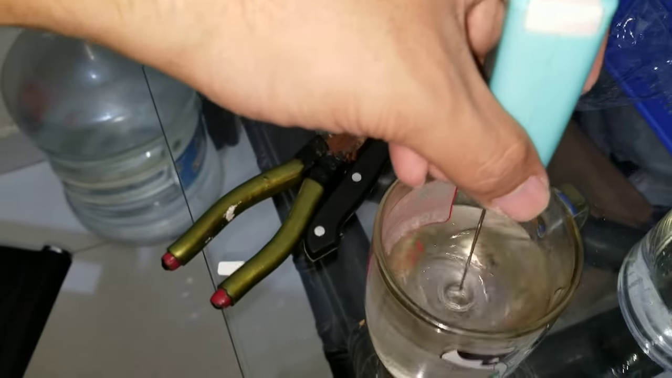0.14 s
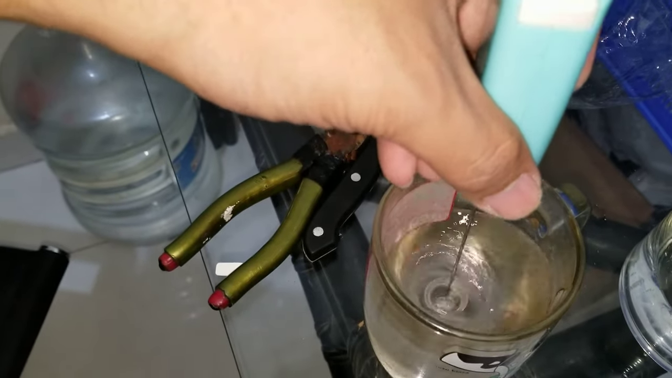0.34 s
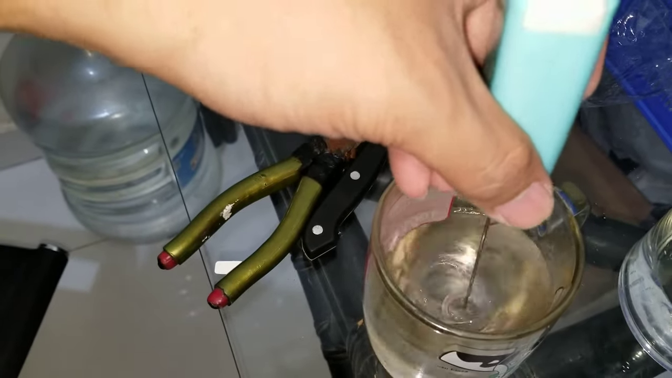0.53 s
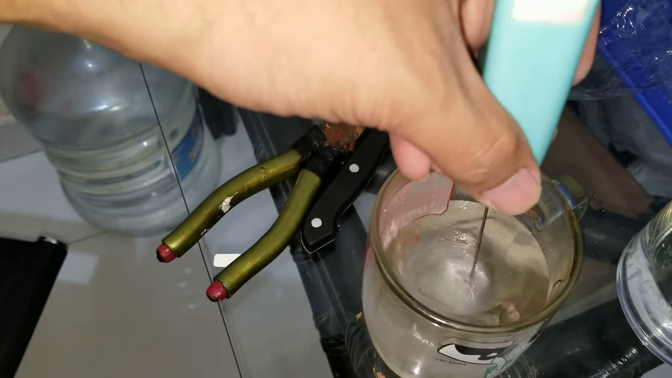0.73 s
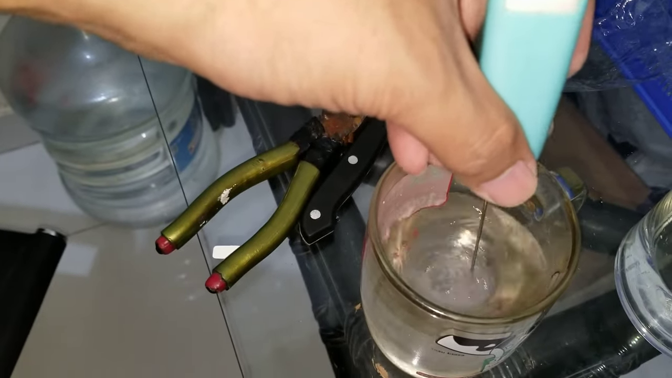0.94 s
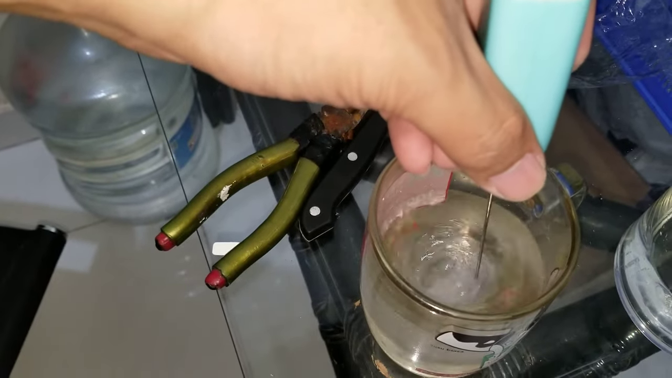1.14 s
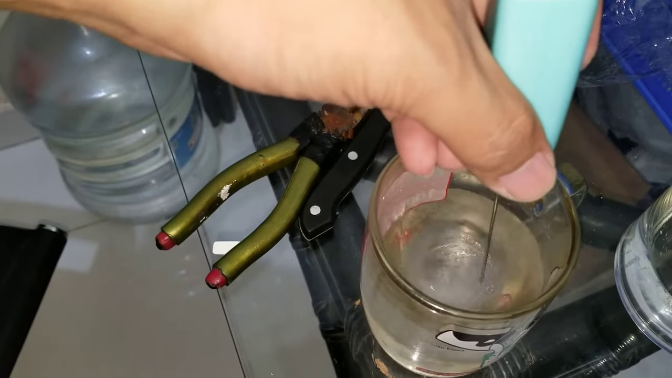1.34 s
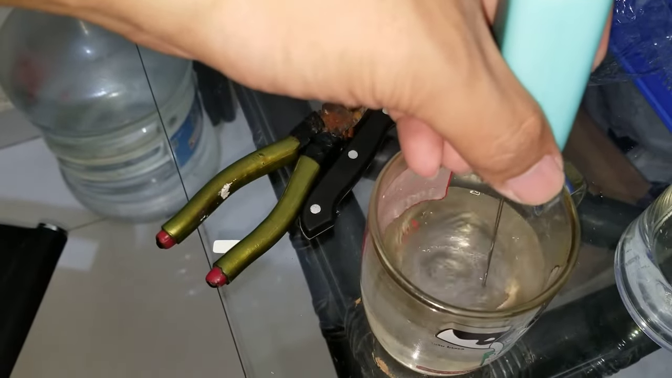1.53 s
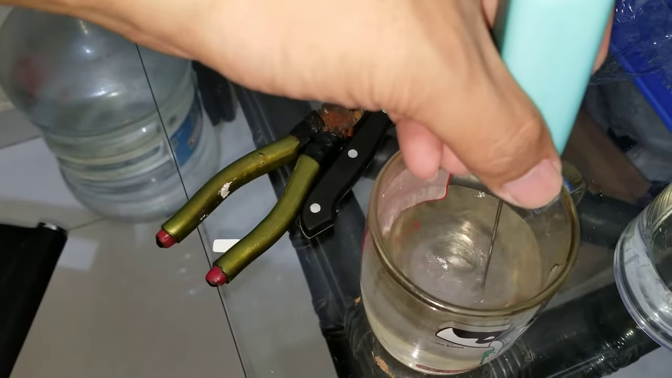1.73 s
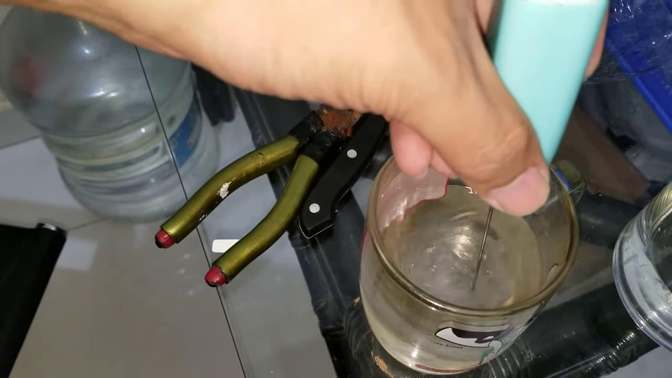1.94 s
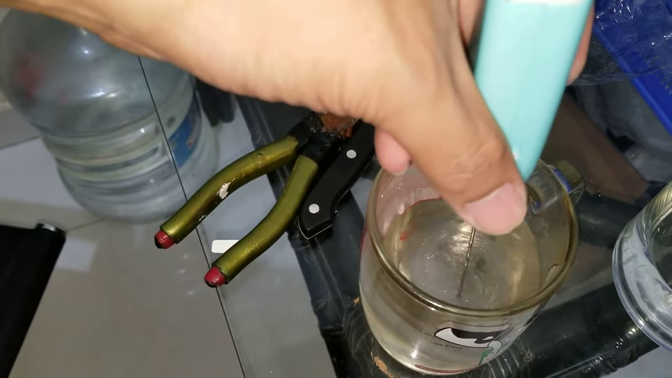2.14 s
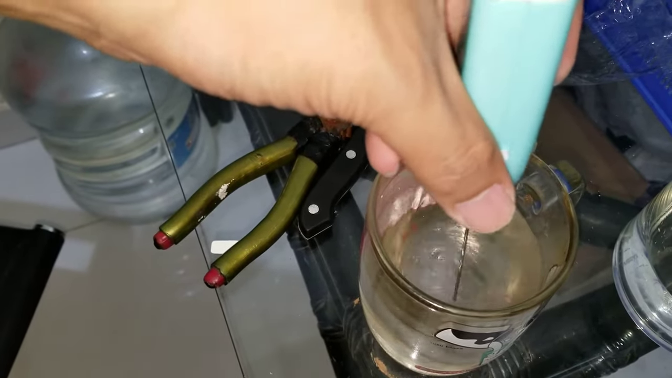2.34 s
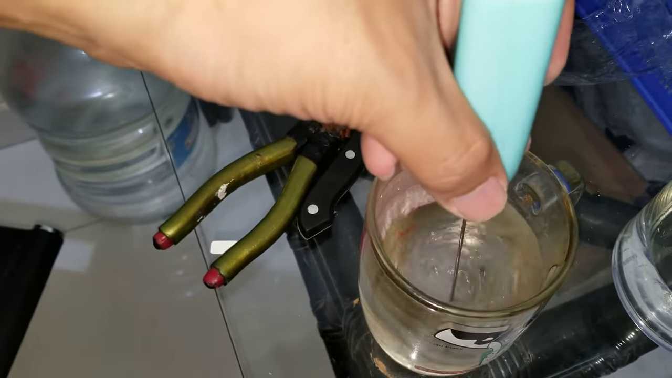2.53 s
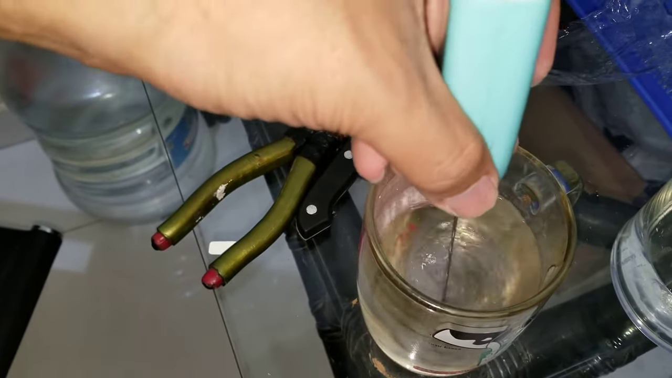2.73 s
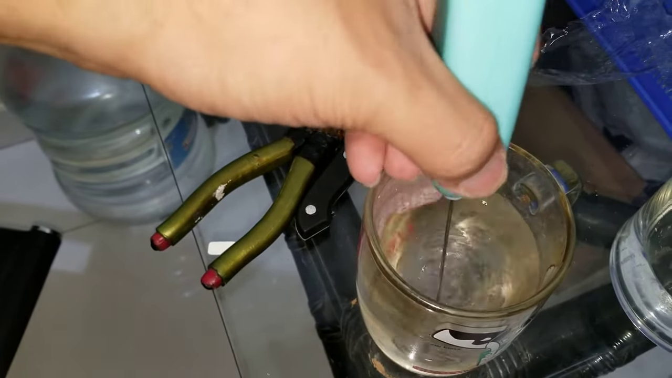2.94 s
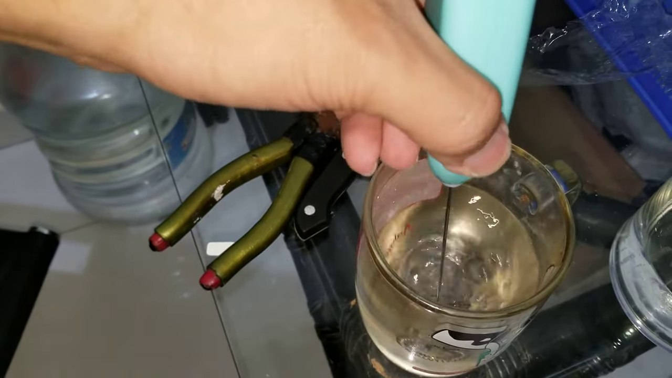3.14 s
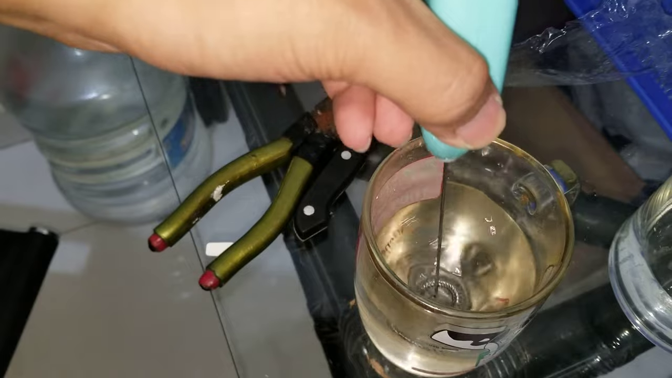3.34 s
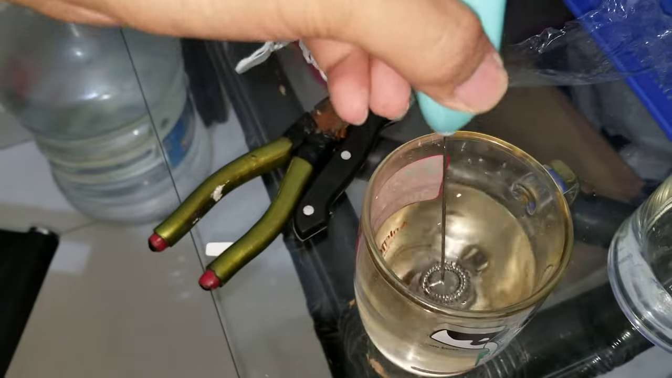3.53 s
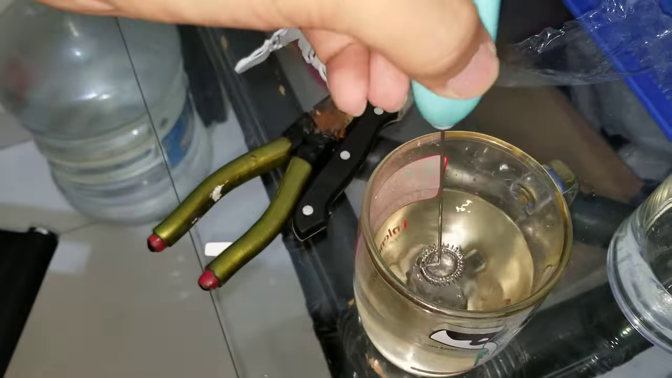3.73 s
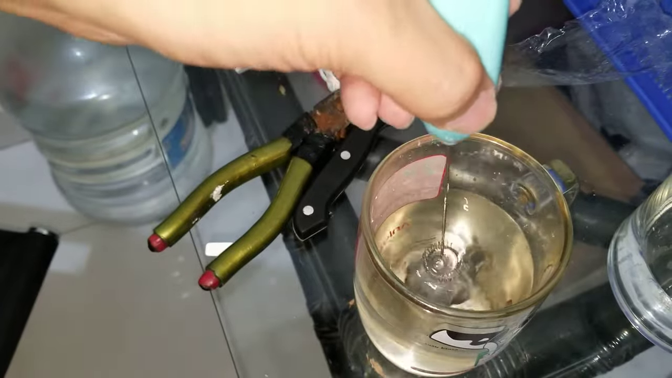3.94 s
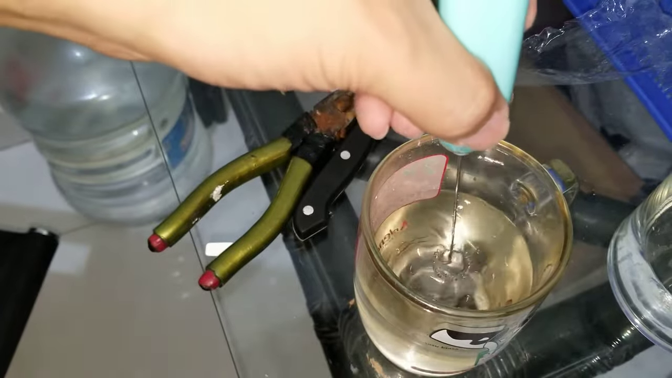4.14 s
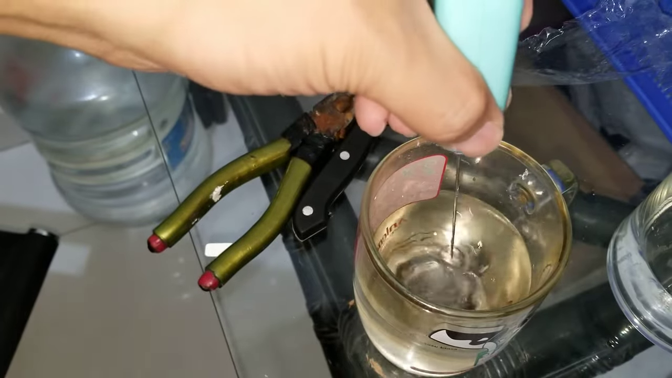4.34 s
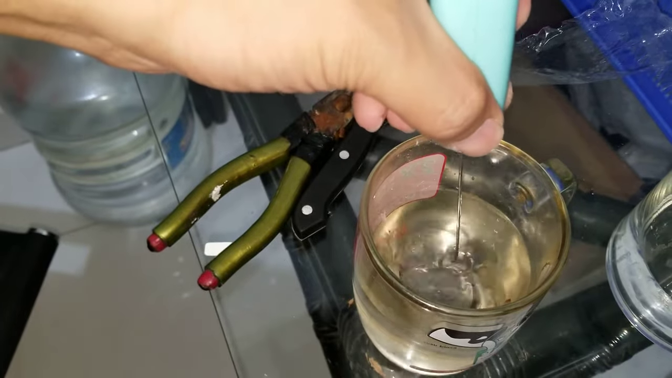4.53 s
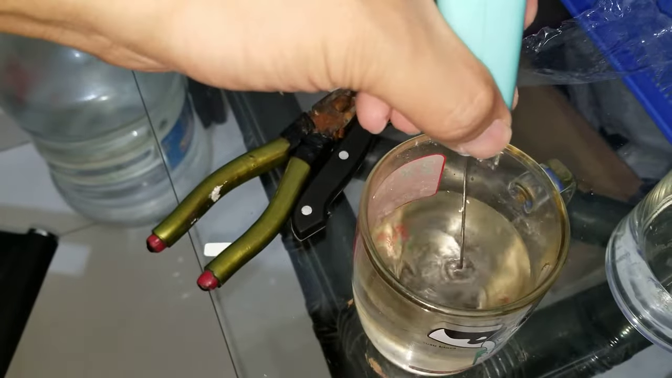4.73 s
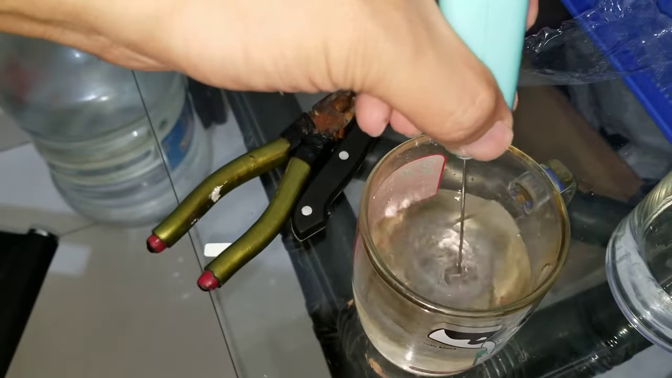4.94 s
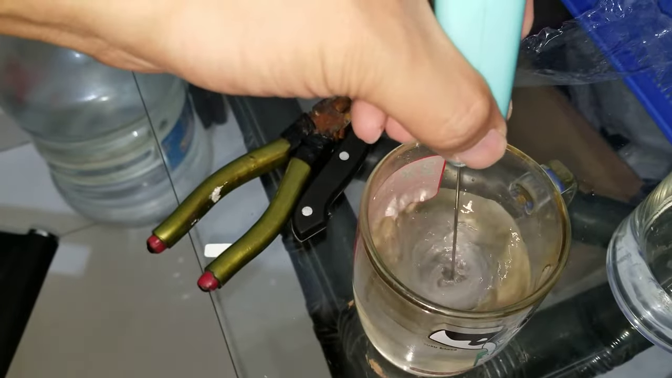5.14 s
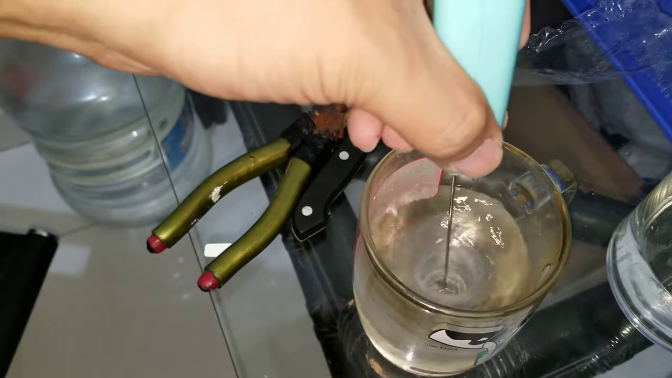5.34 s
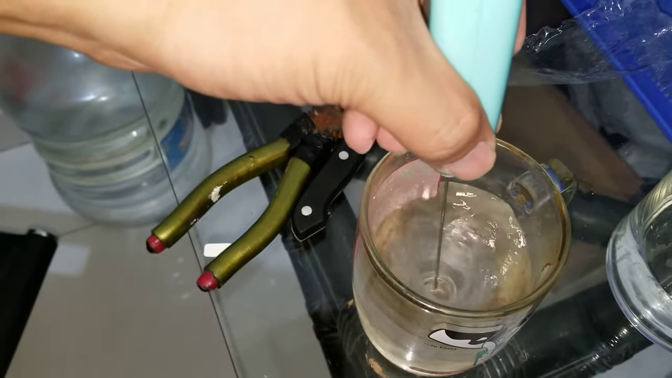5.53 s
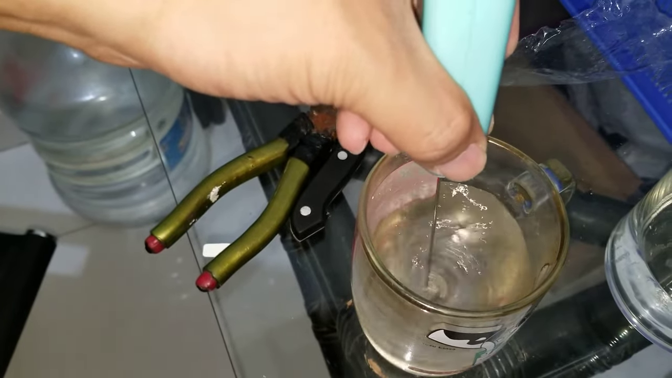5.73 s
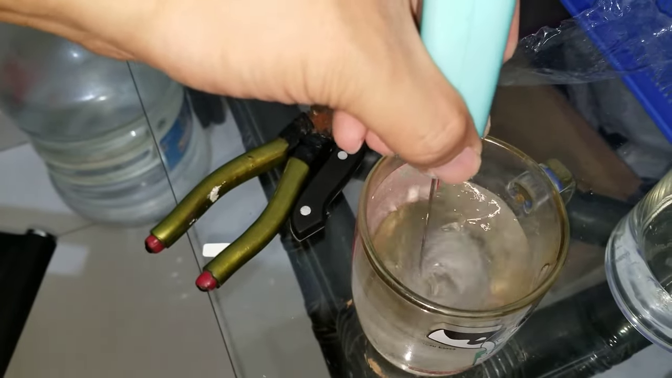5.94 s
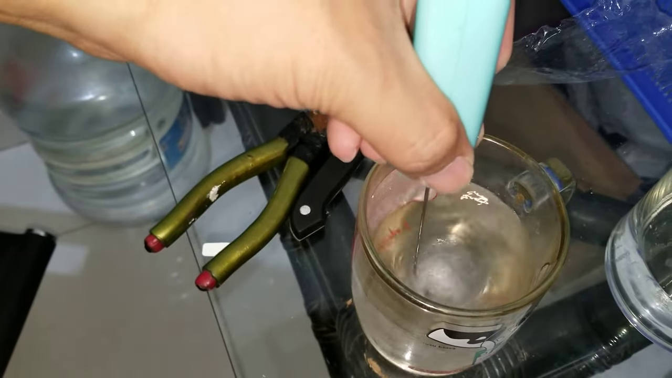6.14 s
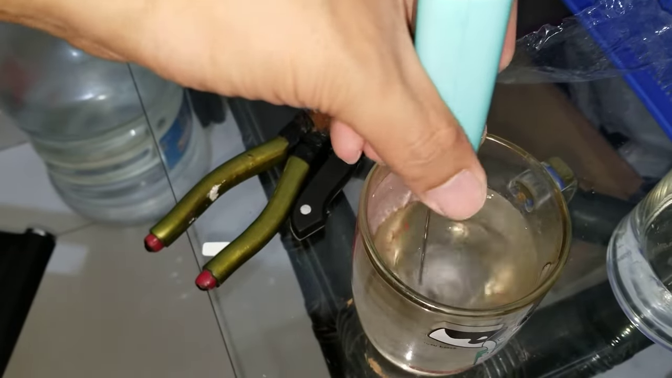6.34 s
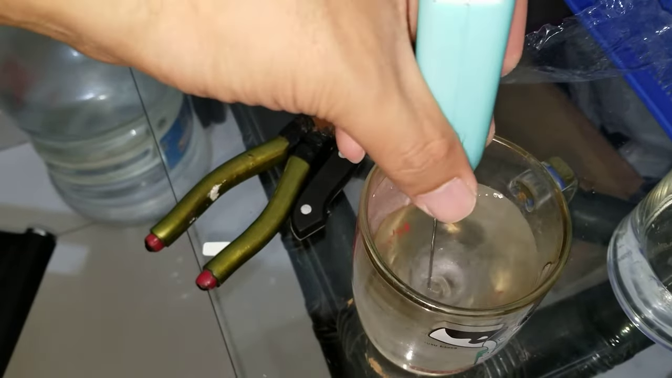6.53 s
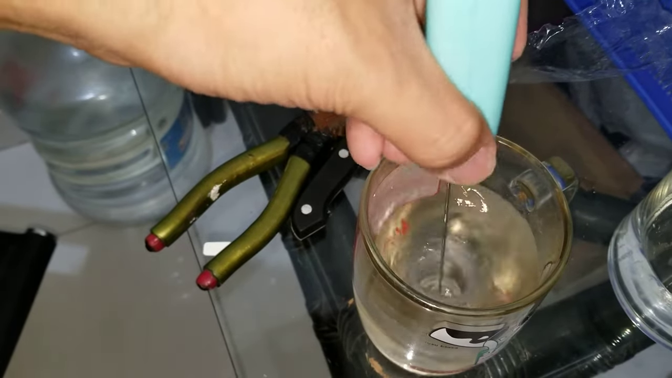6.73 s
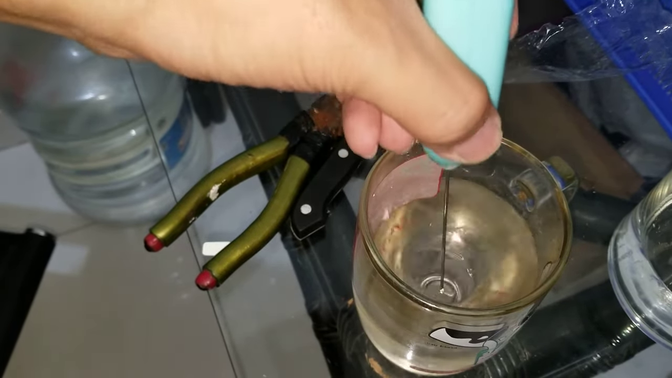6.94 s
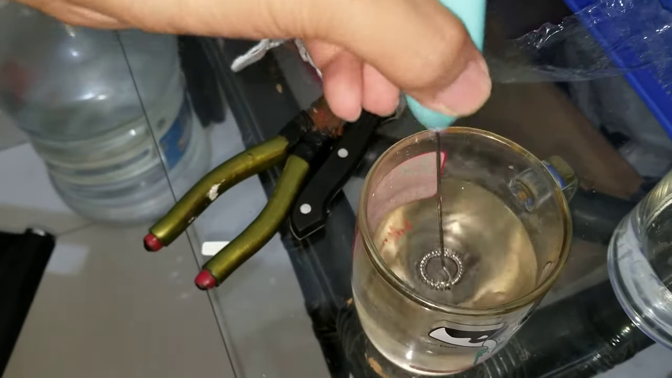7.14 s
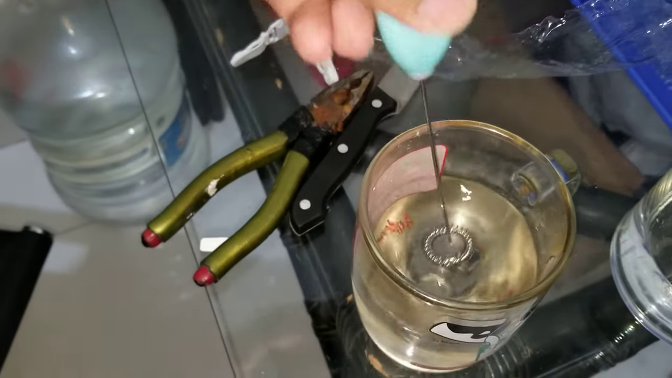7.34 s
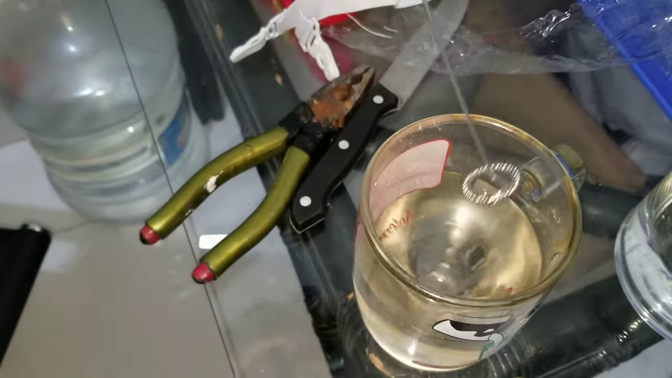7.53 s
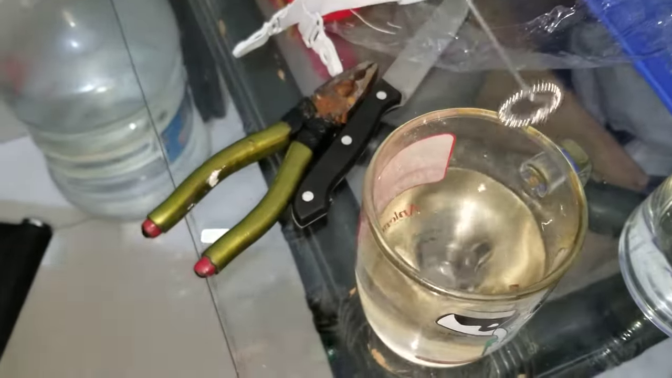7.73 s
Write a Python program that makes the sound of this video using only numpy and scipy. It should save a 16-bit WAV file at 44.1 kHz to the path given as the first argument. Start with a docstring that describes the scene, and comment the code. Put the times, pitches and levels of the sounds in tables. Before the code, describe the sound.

A thin motor whir and bubbly churning of water in a glass mug, recorded close with short room reflections. It surges wetly at first, then eases to a steadier burble. A loud click cuts it, leaving low appliance hum that briefly dips. It clicks on again, spits, deepens into rough gurgling and spray, clicks off with last gulps, and leaves quiet room tone.

```python
"""Milk frother in a glass mug

A battery frother whisks water close by in a small hard room: running at first, it clicks off, on and off again.
Noise and resonances make the whirring motor; clouds of short rising tones make the bubbles, from gurgle to hiss.
Single gulps, splashes, knocks and drips are placed by table, and the water settles within a moment of each spell.
Behind lie coloured noise and the sine tones of a humming appliance, dipping together after the first click."""
import sys
import numpy as np
from scipy import signal
from scipy.fft import rfft, irfft, next_fast_len
from scipy.io import wavfile
from scipy.ndimage import uniform_filter1d, map_coordinates

SR = 44100
rng = np.random.default_rng(int(sys.argv[2]) if len(sys.argv) > 2 else 0)


def wav_out(sig):
    """Save sig, one row per channel (or a flat mono array), as 16-bit PCM at SR to the path in sys.argv[1]."""
    wavfile.write(sys.argv[1], SR, np.round(np.clip(np.atleast_2d(sig).T, -1, 1) * 32767).astype(np.int16))


N = 348121  # length in samples


def amp(db):
    """Decibels to gain."""
    return 10 ** (np.asarray(db) / 20)


def unit(x):
    """Scaled to rms 1."""
    return x / np.sqrt(np.mean(x ** 2) + 1e-20)


def along(points, hz):
    """Reads (Hz, value) points on a log frequency axis."""
    f, v = np.transpose(points)
    return np.interp(np.log(hz + 1), np.log(f + 1), v)


def curves(rows):
    """One value per sample for each column after the time."""
    s, *cols = np.transpose(rows)
    return np.array([np.interp(np.arange(N) / SR, s, c) for c in cols])


def wobble(rate):
    """A smooth random curve, rate knots a second."""
    knots = rng.standard_normal(int(N * rate / SR) + 4)
    return map_coordinates(knots, [np.arange(N) * rate / SR])


def filtered(x, response):
    """Multiplies the spectrum of x by a response of frequency."""
    m = next_fast_len(x.shape[-1] + 8192)
    spectrum = rfft(x, m) * response(np.fft.rfftfreq(m, 1 / SR))
    return irfft(spectrum, m)[..., :x.shape[-1]]


def coloured(x, colour, size=2048):
    """Causal, minimum-phase filter with the given (Hz, dB) shape."""
    cepstrum = irfft(np.log(amp(along(colour, np.fft.rfftfreq(size, 1 / SR)))))
    # folding the cepstrum forward in time makes the filter minimum-phase
    cepstrum[1:size // 2] *= 2
    cepstrum[size // 2 + 1:] = 0
    impulse = irfft(np.exp(rfft(cepstrum)))
    return signal.oaconvolve(x, impulse[None], axes=1)[:, :N]


def add(track, s, sound):
    """Mixes a sound into the track at time s."""
    part = track[..., max(round(s * SR), 0):][..., :sound.shape[-1]]
    part += sound[..., :part.shape[-1]]


def panned(x, left_db):
    """Leans a sound to the left by left_db."""
    return x * amp([[left_db / 2], [-left_db / 2]])


def band(count, hz, sharpness):
    """Stereo noise through a steep-sided resonance, rms 1."""
    width = hz / sharpness

    def response(f):
        return (1j * f * width / (hz * hz - f * f + 1j * f * width)) ** 2
    return unit(filtered(rng.standard_normal((2, count)), response))


def resonator(hz, width_hz, rate, spread_db):
    """A resonance, steady or gliding, struck at random moments (rate a second), rms 1."""
    struck = rng.random(N) < rate / SR
    strength = amp(spread_db * np.clip(rng.standard_normal(N), -2, 2))
    kicks = struck * strength * np.exp(2j * np.pi * rng.random(N))
    envelope = signal.sosfilt(signal.butter(2, width_hz / 2, fs=SR, output="sos"), kicks)
    carrier = np.exp(2j * np.pi * np.cumsum(np.broadcast_to(hz, N)) / SR)
    return unit((envelope * carrier).real)


# hum of an appliance motor and the mains: pitch_hz [Hz], level_db [dB rms at the median background]
HUM_TONES = [(48.4, -71), (90.2, -61), (100.3, -59.5), (180.4, -58), (201.6, -75.5), (252.2, -77),
             (270.5, -66.5), (360.7, -69), (380.2, -68.5), (850, -65)]
# colour of the room noise: freq_hz [Hz], density_db [dB per Hz, relative]
AIR_COLOUR = [(25, -24.5), (45, 0.5), (70, -4.5), (115, -2.5), (200, -0.5), (380, -3.5), (520, -3),
              (850, -3.5), (1300, -9.5), (2300, -12.5), (4300, -14.5), (6500, -24), (11000, -29.5),
              (15500, -36.5)]
# gain on noise and hum alike, ducking after the loud click and recovering:
# time_s [s], level_db [dB rms of the noise]
BACKGROUND_GAIN = [(0, -50.5), (2.85, -51), (3.2, -56), (3.95, -57), (4.4, -52), (7.89, -52)]
# stereo width of the room noise: freq_hz [Hz], left-right likeness [1 = same]
LIKENESS = [(50, 0.97), (150, 0.73), (350, 0.9), (700, 0.14), (2000, 0.042), (8000, .1)]


def background(waver_db=1):
    """Room noise, wider in the treble, and wavering hum tones; one gain ducks both after the loud click."""
    level_db, = curves(BACKGROUND_GAIN)

    def mid_side(hz):
        turn = np.arccos(np.clip(along(LIKENESS, hz), -1, 1)) / 2
        return amp(along(AIR_COLOUR, hz)) * [np.cos(turn), np.sin(turn)]
    mid, side = filtered(rng.standard_normal((2, N)), mid_side)
    air = unit(np.array([mid + side, mid - side]))
    t = np.arange(N) / SR
    hum = np.zeros(N)
    for hz, db in HUM_TONES:
        phase = 2 * np.pi * (hz * t + rng.random()) + hz / 600 * wobble(4)
        hum += amp(db + waver_db * wobble(3.055)) * np.sqrt(2) * np.sin(phase)
    return amp(level_db) * air + amp(level_db - np.median(level_db)) * hum


# decay of the room: freq_hz [Hz], t60_s [s to fall 60 dB]
ROOM_DECAY = [(200, 0.56), (1200, 0.47), (4000, 0.59), (8000, .42), (15000, 0.38)]


def room(x):
    """The hard walls answer after 5 ms with a noise tail, each frequency dying at its own speed."""
    hz, t, z = signal.stft(rng.standard_normal((2, SR * 2 // 3)), SR, nperseg=256)
    decay = amp(-60 * t / along(ROOM_DECAY, hz)[:, None])
    tail = signal.istft(z * decay, SR, nperseg=256)[1]
    tail = np.pad(tail, ((0, 0), (SR // 200, 0))) / np.linalg.norm(tail[0])
    return signal.fftconvolve(x, tail, axes=1)[:, :N]


def bubble(t, hz, cycles, rise):
    """A bubble falls 60 dB in a few cycles and goes up in pitch as it nears the surface."""
    age = t * hz / cycles
    tone = np.sin(2 * np.pi * hz * t * (1 + rise * np.minimum(age, 2)))
    return tone * amp(-60 * age) * (1 - np.exp(-2 * t * hz))


# soft bumps of the hand: start_s [s], level_db [dB, relative], pitch_hz [Hz]
HAND_BUMPS = [(0.113, -27.5, 245), (7.339, -35, 160)]


def bumps(cycles=2.15):
    """Dull, low knocks of the hand: heavily damped tones of steady pitch."""
    track, t = np.zeros(N), np.arange(SR // 10) / SR
    for s, db, hz in HAND_BUMPS:
        add(track, s, amp(db + 15.5) * bubble(t, hz, cycles, 0))
    return track


TOP_HZ = 15900  # nothing sounds above this
# ring of the plastic handle: pitch_hz [Hz], level_db [dB, relative], t60_s [s]
HANDLE_RING = [(2300, -12.5, 0.018), (3240, -26, .015), (4530, -12, 0.012), (6490, -12.5, 0.013),
               (8790, -0.5, 0.0053), (10400, 0, 0.0058), (11680, -7.5, 0.01), (12800, -8, 0.0074),
               (14700, -14, .008)]
# the thumb switch: start_s [s], level_db [dB, relative], tilt_db [dB per octave],
# spring_db [dB, relative level of the spring's buzz]
SWITCH_CLICKS = [(2.9042, -4.5, 3.5, -17.5), (4.272, -39, -6.5, -45), (4.3439, -18.5, -6, -32),
                 (6.7115, -7.5, 2.5, -45)]


def switch(crack_t60=0.0049, rattle_db=-21, rattle_t60=0.03, spring_hz=4020, spring_t60=0.31):
    """The switch snaps over: a hard crack, a short ring of the handle, a rattle and the buzz of its spring."""
    track, t = np.zeros((2, N)), np.arange(SR // 3) / SR
    for s, db, tilt_db, spring_db in SWITCH_CLICKS:
        ring = np.zeros(len(t))
        for hz, level_db, t60 in HANDLE_RING:
            decay = amp(level_db + rng.normal(0, 1) - 60 * t / t60)
            ring += decay * np.sin(2 * np.pi * (hz * t + rng.random()))
        crack = rng.standard_normal((2, len(t))) * amp(-60 * t / crack_t60)
        rattle = rng.standard_normal((2, len(t))) * amp(rattle_db - 60 * t / rattle_t60)

        def tone(hz):
            tilt = amp(tilt_db * np.log2(np.maximum(hz, 2500) / 8000))
            return tilt * hz ** 2 / (hz ** 2 + 1500 ** 2) * (hz < TOP_HZ)
        attack = 1 - np.exp(-t / 0.002)
        click = unit(filtered((0.32 * ring + crack + rattle) * attack, tone))
        spring = band(len(t), spring_hz, 5) * amp(spring_db - 60 * t / spring_t60)
        add(track, s, amp(db - 31) * click + amp(db - 17.0) * spring)
    return panned(track, 1.5)


# motor powered: on_s [s], off_s [s]
MOTOR_RUNS = [(-.2, 2.905), (4.283, 6.712)]
# scrape of the brushes in the housing: freq_hz [Hz], density_db [dB per Hz, relative]
BRUSH_COLOUR = [(1200, -22.5), (2700, -2), (3300, -3), (3700, -7.5), (5000, -4), (7500, -9.5), (8800, -5.5),
                (9700, -13), (10600, -3.5), (11500, 6), (12100, -9.5), (14500, -3.5), (15600, -7)]
# narrow hiss of the brushes: time_s [s], pitch_hz [Hz], level_db [dB, relative to the scrape]
HISS_GLIDE = [(.8, 11320, -10), (1.85, 10500, -8.5), (2.2, 11400, -5), (2.9, 11400, -20)]


def motor(db=-56, whine_db=-5.5, flutter_db=2, shaft_hz=48, beat_db=2.0, spin_up=.06, coast=0.0805):
    """Brushes scrape, whine and hiss inside the handle, a little harder once a turn; speed sets loudness."""
    t = np.arange(N) / SR
    speed = np.zeros(N)  # 1 = full speed
    for on, off in MOTOR_RUNS:
        rising = 1 - np.exp(-np.maximum(t - on, 0) / spin_up)
        speed += rising * np.exp(-np.maximum(t - off, 0) / coast)
    turn = 2 * np.pi * np.cumsum(shaft_hz * speed * (1 + .06 * wobble(5.6))) / SR
    scrape = unit(coloured(rng.standard_normal((2, N)), BRUSH_COLOUR))
    whine_gain = amp(whine_db + flutter_db * wobble(40)) * speed ** 2
    whine = whine_gain * resonator(3290, width_hz=160, rate=1700, spread_db=2.5)
    hiss_hz, hiss_db = curves(HISS_GLIDE)
    hiss = amp(hiss_db) * resonator(hiss_hz, width_hz=550, rate=3000, spread_db=3)
    return amp(db + beat_db * np.sin(turn)) * speed * (scrape + whine + hiss)


# splashes as the coil dips in, flung droplets and late drips:
# start_s [s], level_db [dB, relative], pitch_hz [Hz]
SPITS = [(2.137, -33.5, 5150), (2.277, -28, 12500), (2.389, -30.5, 5000), (4.578, -36.5, 5300),
         (4.599, -26.5, 7600), (4.618, -32.5, 4200), (4.672, -32, 4250), (4.704, -27, 5250),
         (6.681, -22, 12900), (7.085, -45.5, 14000), (7.79, -53, 11200)]


def spatter(sharpness=2.47, t60=0.034):
    """Each dip splash, droplet or drip is a short, pitched spit of fading band noise."""
    track, t = np.zeros((2, N)), np.arange(SR // 10) / SR
    for s, db, hz in SPITS:
        add(track, s, amp(db - 2 - 60 * t / t60) * band(len(t), hz, sharpness))
    return track


# splashes and knocks that ring the mug: start_s [s], level_db [dB before the decay], pitch_hz [Hz]
MUG_RINGS = [(0.322, -25, 2470), (0.676, -24, 2500), (0.704, -24, 2740), (0.727, -26, 2740),
             (0.754, -23.5, 2760), (5.372, -29.5, 2540), (5.425, -29, 2450), (5.443, -26, 2400),
             (5.471, -25, 2540), (5.498, -27, 2500), (6.412, -26, 2380), (6.571, -26, 2400),
             (6.819, -25.5, 2350), (6.834, -32, 2310)]


def mug_rings(attack=0.00075, t60=0.032):
    """Splashes and knocks ring the mug briefly, damped by the water in it: one decaying sine each."""
    track, t = np.zeros(N), np.arange(SR // 10) / SR
    for s, db, hz in MUG_RINGS:
        ring = np.sin(2 * np.pi * hz * t) * (1 - np.exp(-t / attack))
        add(track, s, amp(db - 60 * t / t60) * ring)
    return track


def lesser_gulps(gurgle, hz=1220, scatter_db=2, octaves=0.247, splash_db=-10, per_s=9, over_gurgle_db=6.5):
    """Chance gulps, following the gurgle level around them; rows as in BIG_GULPS."""
    rows = []
    for when, strength, pitch in rng.random((int(per_s * N / SR), 3)):
        gurgle_db = 20 * np.log10(gurgle[int(when * N)])
        db = gurgle_db + over_gurgle_db + scatter_db * (2 * strength - 1)
        rows.append((when * N / SR, db, hz * 2 ** (octaves * (2 * pitch - 1)), splash_db))
    return rows


# the loudest big bubbles: start_s [s], level_db [dB peak of the plop], pitch_hz [Hz],
# splash_db [dB relative to the plop, before a shared lift]
BIG_GULPS = [(0.0158, -31, 1250, -1), (0.321, -35, 1200, 8.5), (0.65, -29, 1330, -15),
             (0.7555, -29, 1080, 7), (0.768, -27, 1190, -8), (0.8992, -27.5, 1050, -1),
             (0.969, -25.5, 1510, -14), (1.0696, -27, 1110, -14), (1.1143, -27, 1370, -13),
             (1.7523, -31.5, 1780, -13), (1.9762, -29.5, 1074, -8), (1.9985, -31, 1780, -6),
             (2.0273, -27, 1150, -12), (2.137, -30, 1460, 6), (2.82, -28, 1120, -18),
             (2.8717, -30.5, 1090, -8.5), (4.841, -28.5, 1148, 3.5), (5.17, -26.5, 1240, 0.5),
             (5.441, -26, 1340, -1), (5.679, -27.5, 1102, -10), (5.8868, -25.5, 1280, 2),
             (6.053, -27, 1210, -15), (6.4102, -27.5, 1224, 0), (6.557, -34, 1534, 11.5),
             (6.7545, -24, 1260, -4.5), (6.7969, -25.5, 1130, -19), (6.832, -32, 1570, 1)]
# colour of middle-sized bubbles in the mug: freq_hz [Hz], density_db [dB per Hz, relative]
SPLASH_COLOUR = [(1200, -43), (2080, -13), (2300, -4.5), (2700, 2.5), (3000, -1.5), (3300, 3), (3700, -5.5),
                 (4600, -29), (8000, -51.5)]


def gulps(gurgle, cycles=13, splash_t60=0.029, splash_gain_db=4):
    """Now and then the vortex swallows one big bubble: a rising plop with a little noise splash."""
    plops, splashes, t = np.zeros(N), np.zeros(N), np.arange(SR // 20) / SR
    for s, db, hz, splash_db in list(BIG_GULPS) + lesser_gulps(gurgle):
        plop = bubble(t, hz, cycles, 0.073) * (1 - np.exp(-t / 0.00061))
        add(plops, s, amp(db) * plop / np.abs(plop).max())
        splash_decay = amp(db + splash_db + splash_gain_db - 60 * t / splash_t60)
        add(splashes, s, splash_decay * rng.standard_normal(len(t)))
    return plops + coloured(splashes[None], SPLASH_COLOUR)


# air drawn in by the coil, one table a spell: time_s [s],
# gurgle_db, fizz_db, spray_db [dB, relative levels of big bubbles, small bubbles and spray]
FIRST_AIR = [(0, -40, -43, -35), (0.28, -43.5, -47, -34.5), (0.41, -54.5, -51, -41),
             (0.54, -52.5, -46.5, -35.5), (0.69, -38, -36, -29), (0.77, -35.5, -38.5, -36.5),
             (0.88, -45, -54.5, -54), (1.05, -40.5, -54.5, -54.5), (1.92, -45, -55, -56),
             (2.05, -38.5, -51, -51.5), (2.2, -47, -47.5, -51.5), (2.32, -44.5, -47.5, -48.5),
             (2.89, -47, -48.5, -49.5)]
SECOND_AIR = [(4.58, -54, -51, -55), (4.7, -53, -52.5, -53), (4.86, -43, -43, -45), (5.17, -43.5, -44, -44),
              (5.35, -42.5, -42, -38.5), (5.66, -42, -46.5, -36.5), (5.88, -37, -36, -33.5),
              (6.03, -37, -43, -42), (6.25, -41, -43.5, -44), (6.45, -40, -41.5, -41.5),
              (6.62, -45, -46.5, -38), (6.831, -44, -49, -37.5)]


def intake(settle_s=0.063):
    """Gains of gurgle, fizz and spray; after each spell they drop 20 dB every settle_s."""
    t = np.arange(N) / SR
    level = amp(-120)  # near-silent floor
    for rows in (FIRST_AIR, SECOND_AIR):
        late = np.maximum(t - rows[-1][0], 0)
        level = level + amp(curves(rows) - 20 * late / settle_s) * (t > rows[0][0])
    return level


def opening(fade_s=.085):
    """1 as the vortex opens anew in the second spell, falling towards 0 as it deepens."""
    age = np.arange(N) / SR - SECOND_AIR[0][0]
    return np.exp(-np.abs(age) / fade_s) * (age > 0)


# air pocket once the vortex has formed: time_s [s], pitch_hz [Hz]
POCKET_GLIDE = [(.5, 1300), (.75, 1180), (1.0, 1290), (2.0, 1260), (2.3, 1130), (4.8, 1160), (5.7, 1204),
                (5.98, 1447), (6.7, 1183)]


def pocket_pitch(opening_octaves=.8):
    """The reopening air pocket starts small and high, and falls to its table pitch as the vortex opens."""
    return curves(POCKET_GLIDE)[0] * 2 ** (opening_octaves * opening())


def lingering(level, life):
    """A level that builds up and fades with a time constant of life seconds."""
    keep = np.exp(-1 / (life * SR))
    return signal.lfilter([1 - keep], [1, -keep], level)


def swarm(colour, rate, hz, octaves, cycles, spread_db, wash, width, size):
    """Stereo cloud of bubbles scattered around a pitch, on a wash of noise for tiny ones, rms 1."""
    count = int(rate * N / SR)
    when, strength = rng.random((2, count))
    pitch, place = rng.standard_normal((2, count))
    start = (when * N).astype(int)
    pitch = np.minimum(np.broadcast_to(hz, N)[start] * 2 ** (octaves * pitch), SR / 2.5)
    gain = amp(-spread_db * np.log(np.maximum(strength, .02)))  # few strong, many weak
    rings = gain[:, None] * bubble(np.arange(size) / SR, pitch[:, None], cycles, 0.093)
    at = (start[:, None] + np.arange(size)).ravel()

    def cloud(weight):
        summed = np.bincount(at, (rings * weight).ravel(), N)[:N]
        return unit(summed) + wash * rng.standard_normal(N)
    mid, side = cloud(1), cloud(place[:, None])
    return unit(coloured(np.array([mid + width * side, mid - width * side]), colour))


def swirled(x, depth_db):
    """The moving water surface keeps shifting small peaks and dips in the colour."""
    z = signal.stft(x, nperseg=512)[2]
    field = rng.standard_normal(z.shape[1:])
    for _ in range(2):
        field = uniform_filter1d(field, size=3, axis=0)
        field = uniform_filter1d(field, size=35, axis=1)
    return signal.istft(z * amp(depth_db * unit(field)), nperseg=512)[1][:, :N]


# colours of big bubbles, small bubbles and spray in the mug: freq_hz [Hz], density_db [dB per Hz, relative]
GURGLE_COLOUR = [(300, -28.5), (480, -12), (640, -5), (800, -9), (950, -10.5), (1100, 2.5), (1300, -9),
                 (1550, -1.5), (1850, 2.5), (2100, -3.5), (2600, -30), (4000, -57)]
FIZZ_COLOUR = [(2500, -26), (3450, -4.5), (4000, 3), (4500, -1), (5100, 2), (5700, 1.5), (6400, -7.5),
               (7400, -4), (9000, -24.5), (14000, -56)]
SPRAY_COLOUR = [(3000, -63), (6000, -7.5), (7400, -8.5), (8700, 0.5), (9900, -3.5), (11300, 1.5),
                (12400, 0.5), (13500, 0.5), (14400, 1.5), (15600, 4), (16500, -7.5)]


def churn(level, throb_db=0.95, whirl_hz=45, surge_db=0.5, usual_db=-42, splash_db=-44.5, wall_db=-52,
          opening_db=8, overtone_ratio=1.9, overtone_db=-3, froth_db=-20, froth_life_s=0.48):
    """The coil chops air into four sizes of bubble; the whirling shaft makes them come in quick surges."""
    whirl = np.sin(2 * np.pi * np.cumsum(whirl_hz * (1 + 0.13 * wobble(12))) / SR)
    gurgle, fizz, spray = level * amp(throb_db * whirl + 1.37 * wobble(70))
    gurgle = gurgle * amp(surge_db * wobble(14))

    # levels over ordinary churning; each exponent is dB gained per dB
    more_gurgle, more_fizz, more_spray = gurgle / amp(usual_db), fizz / amp(usual_db), spray / amp(usual_db)
    splash = amp(splash_db + surge_db * wobble(15)) * more_gurgle ** .6 * more_fizz ** .25 * more_spray ** .15
    # bubbles striking the wall ring the mug
    strikes = amp(wall_db + surge_db * wobble(12)) * more_gurgle ** .42 * more_spray ** 0.66
    wall = strikes * resonator(2380, width_hz=290, rate=350, spread_db=5)

    # the newly opened pocket rings louder, with an upper resonance
    pocket_hz = pocket_pitch()
    overtone = resonator(overtone_ratio * pocket_hz, width_hz=350, rate=450, spread_db=1)
    overtone = amp(overtone_db) * opening() * overtone
    pocket = resonator(pocket_hz, width_hz=277, rate=450, spread_db=3.0) + overtone
    pocket = gurgle * amp(-6.5 + opening_db * opening()) * pocket

    # a gentle vortex only hums in its pocket; loose bubbles grow faster than it does
    big = gurgle ** 1.353 * amp(9.5) * swarm(
        GURGLE_COLOUR, rate=600, hz=pocket_hz, octaves=0.39, cycles=19.4,
        spread_db=3.0, wash=1.0, width=0.43, size=640)
    medium = splash * swarm(
        SPLASH_COLOUR, rate=900, hz=2850, octaves=0.22, cycles=18.5,
        spread_db=0.5, wash=0.79, width=.25, size=320)
    small = fizz * amp(-1) * swarm(
        FIZZ_COLOUR, rate=1200, hz=4760, octaves=0.38, cycles=28,
        spread_db=0.5, wash=0.8, width=0.46, size=192)
    mist = spray * amp(0.5) * swarm(
        SPRAY_COLOUR, rate=3500, hz=11870, octaves=0.54, cycles=6.9,
        spread_db=1.5, wash=0.6, width=0.82, size=48)
    # froth left by the spray crackles on
    froth = amp(froth_db) * lingering(level[2], froth_life_s) * swarm(
        SPRAY_COLOUR, rate=400, hz=11000, octaves=.3, cycles=20,
        spread_db=3, wash=1, width=.8, size=96)
    # the product makes hard churning heave the water far more than gentle churning
    slosh = gurgle * fizz * amp(17) * resonator(500, width_hz=270, rate=200, spread_db=1.5)
    return pocket + wall + slosh + swirled(big + medium + small + mist + froth, depth_db=1.0)


# stereo lean of the mug: freq_hz [Hz], left_db [dB left over right]
MUG_LEAN = [(600, 5.5), (1200, -1.5), (1800, -7), (2700, 1.5), (5500, 2.5), (9000, 1), (11500, 1.5),
            (13500, 8.5), (15500, 4.5)]


def scene():
    """Frother and water in the room, over the background; the hand shades the switch from the walls."""
    level = intake()
    water = churn(level) + gulps(level[0]) + mug_rings() + spatter() + motor()
    clicks = switch()

    def lean(hz):
        return amp(along(MUG_LEAN, hz) * np.array([[.5], [-.5]]))
    mug = filtered(water + room(amp(-6.5) * water), lean)
    hand_shade = [(2500, -6), (6000, -7.0), (12000, -6.5)]  # (Hz, dB)
    shaded = filtered(clicks, lambda hz: amp(along(hand_shade, hz)))
    return mug + clicks + room(shaded) + bumps() + background()


def record(dry):
    """Removes everything above the band limit."""
    return filtered(dry, lambda hz: hz < TOP_HZ)


dry = scene()
out = record(dry)
wav_out(out)
```